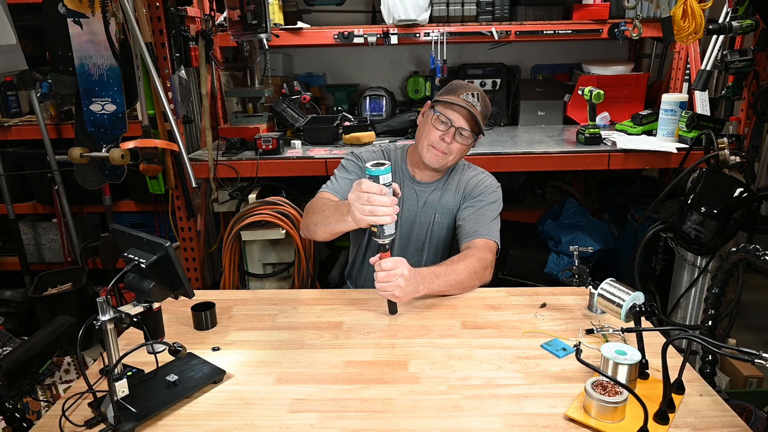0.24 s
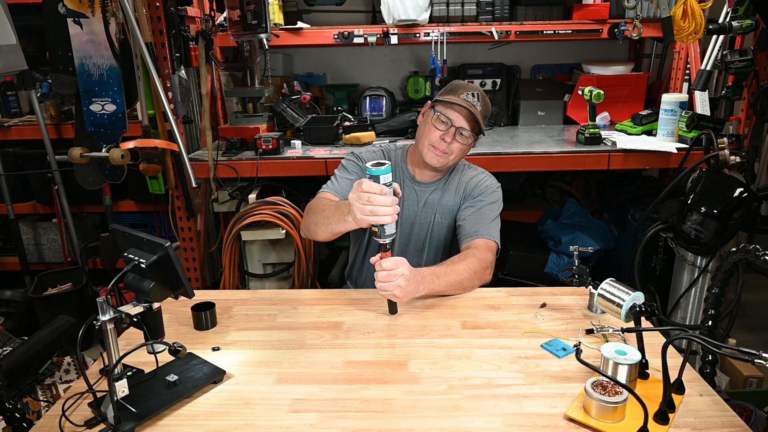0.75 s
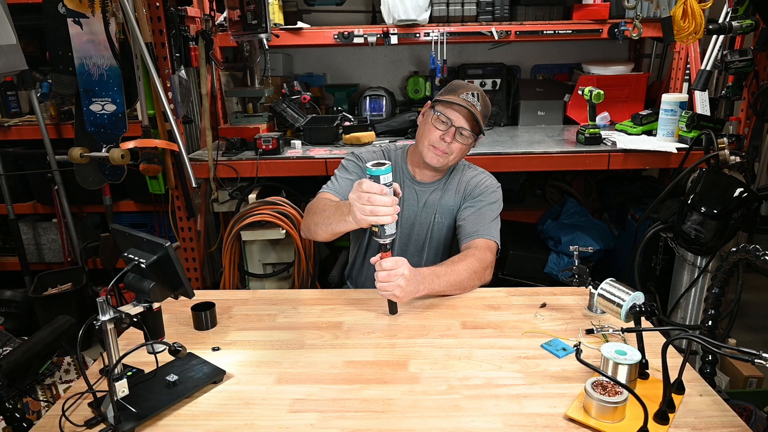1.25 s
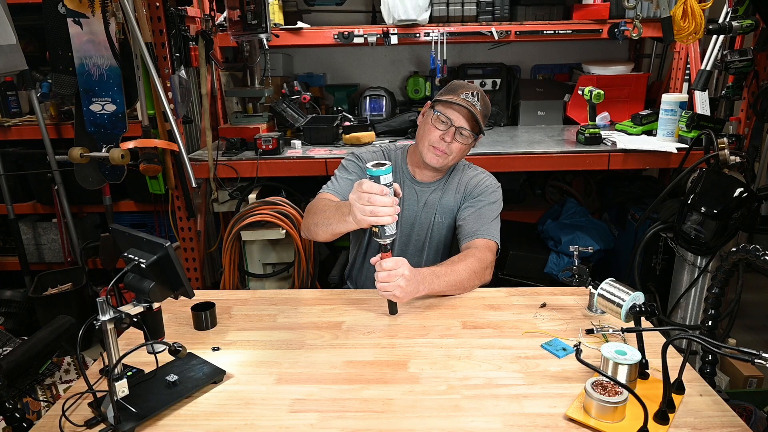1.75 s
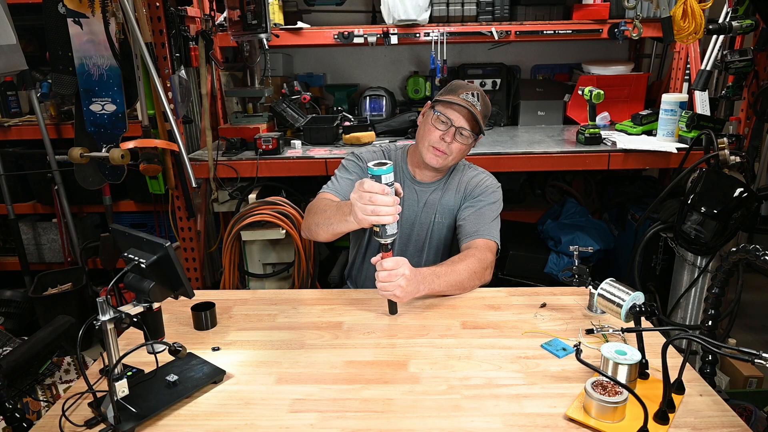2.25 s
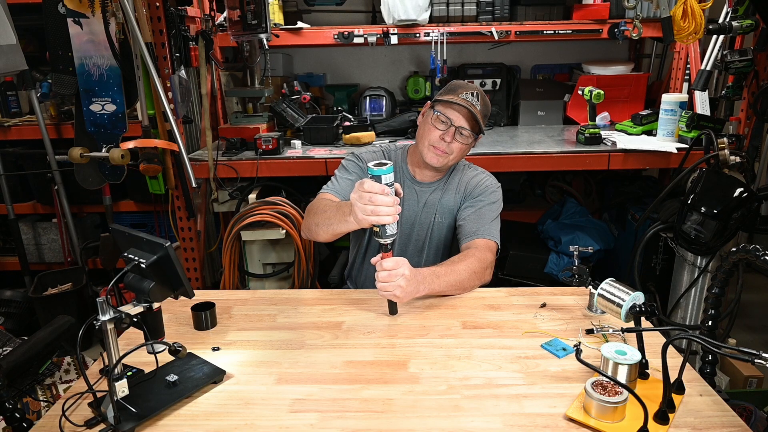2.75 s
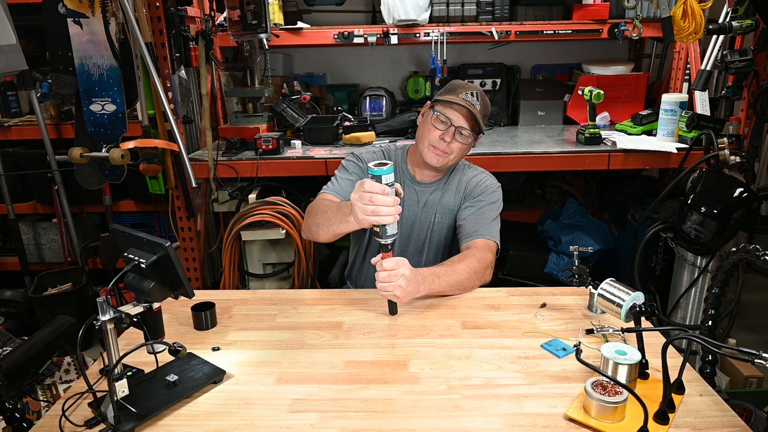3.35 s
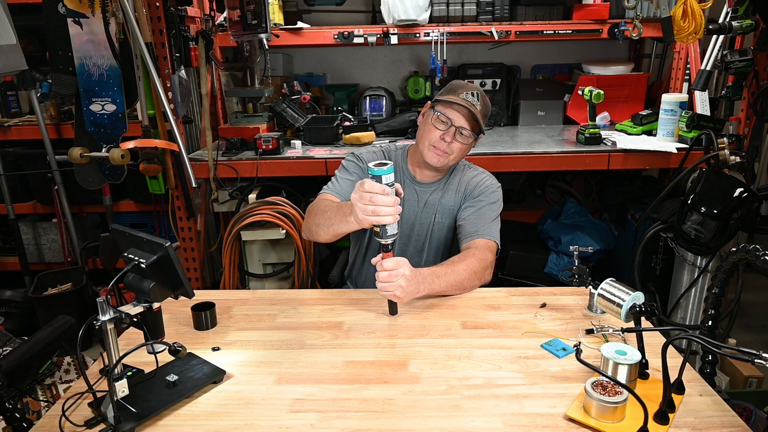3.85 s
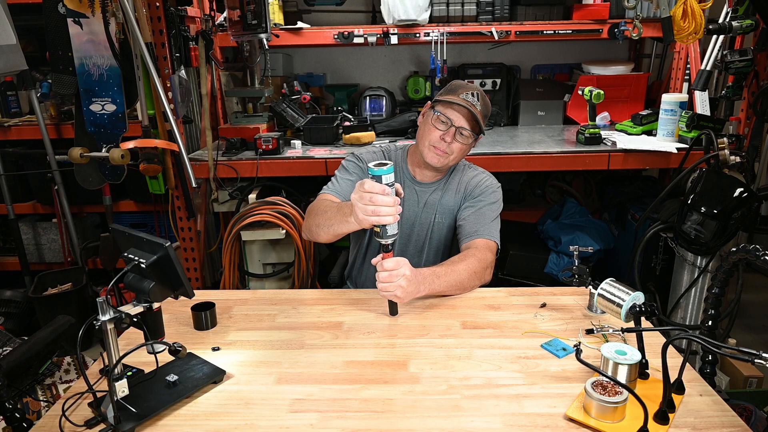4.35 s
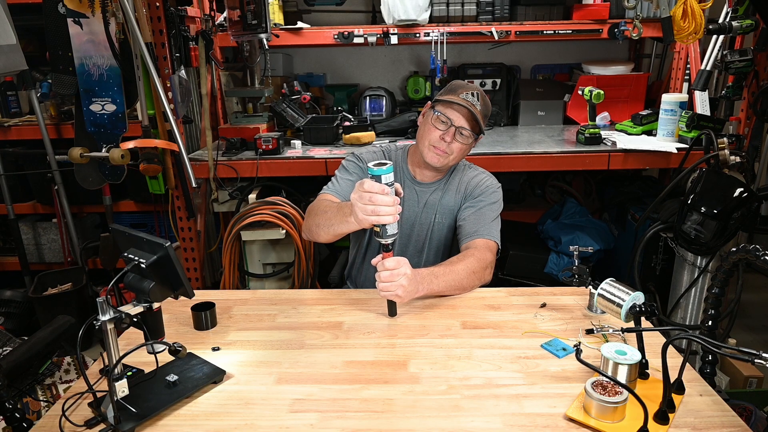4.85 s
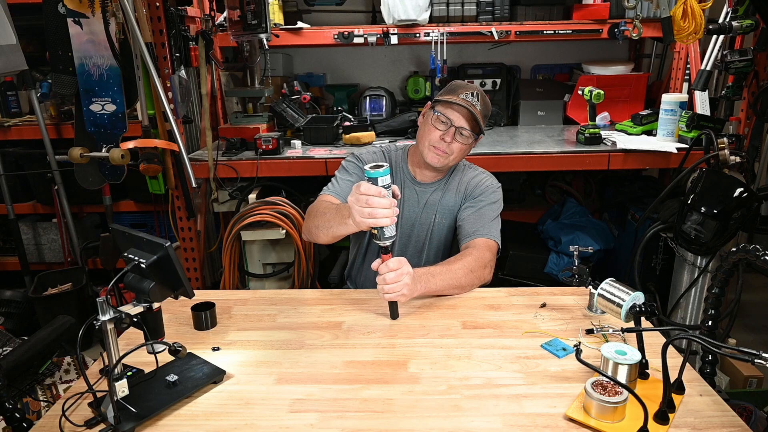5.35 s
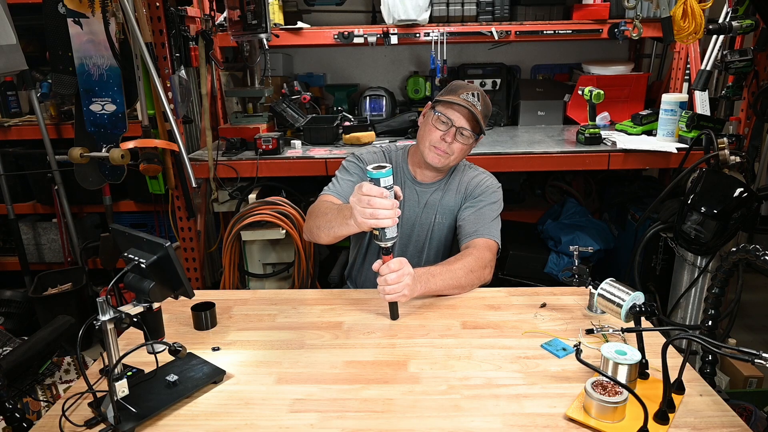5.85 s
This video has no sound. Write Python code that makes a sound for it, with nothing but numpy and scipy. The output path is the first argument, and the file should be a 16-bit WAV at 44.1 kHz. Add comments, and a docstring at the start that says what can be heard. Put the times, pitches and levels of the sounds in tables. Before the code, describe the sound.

A soft, spitting gas hiss from a butane can turns into a strong, sharp hiss, with light ticks and muffled knocks.

```python
"""Gas seeps and sputters, with a few ticks, as a butane can is pressed into the fill valve of a tool on a
workbench. Turbulence excites the resonances of the gap round the stem; after three seconds the seal
gives and it hisses hard, with brief puffs and a thin whistle. Towards the end the hand-damped can knocks
dully on its seat. A fan hums faintly behind, in a quiet shop."""
import sys
import numpy as np
from scipy import signal
from scipy.fft import rfft, irfft
from scipy.io import wavfile

SR = 44100
rng = np.random.default_rng(int(sys.argv[2]) if len(sys.argv) > 2 else 0)


def dump_mix(stems):
    """Bounce the given channels to the path in sys.argv[1] as a 16-bit WAV at rate SR."""
    frames = np.atleast_2d(stems).T  # one column per channel
    limited = np.clip(frames, -1, 1)  # hard clip at full scale
    pcm = np.round(limited * 32767).astype(np.int16)
    wavfile.write(sys.argv[1], SR, pcm)


N = 269010
TIME = np.arange(N) / SR
HZ = np.fft.rfftfreq(N, 1 / SR) + 1e-3


def from_db(db):
    """The decibel scale: amplitude grows tenfold every 20 dB."""
    return 10 ** (np.asarray(db) / 20)


def rms_one(x):
    """Normalisation to unit mean power."""
    return x / np.sqrt(np.mean(x ** 2) + 1e-20)


def in_time(points):
    """Linear interpolation of a curve at every sample."""
    seconds, value = np.transpose(points)
    return np.interp(TIME, seconds, value)


def over_hz(points):
    """Interpolation of a spectrum along a logarithmic frequency axis."""
    hz, value = np.transpose(points)
    return np.interp(np.log(HZ), np.log(hz), value)


def flutter(rate_hz):
    """Random modulation: low-passed noise of unit rms wavers up to about the given rate."""
    return rms_one(irfft(rfft(rng.standard_normal(N)) / np.sqrt(1 + (HZ / rate_hz) ** 4), N))


def stereo_noise(correlation):
    """Partial coherence: spectra of white noise at two microphones that hear partly the same thing."""
    alike = np.clip(correlation, 0, .999)
    mid, side = rfft(rng.standard_normal((2, N)))
    return np.sqrt(1 + alike) * mid + np.sqrt(1 - alike) * side * [[1], [-1]]


def resonances(modes, valley_db):
    """Resonant gain: steep-sided peaks add in power over a weak broad bed that fades in the bass."""
    power = sum((from_db(db) / (1 + ((HZ ** 2 - hz ** 2) / (HZ * width)) ** 2)) ** 2
                for hz, width, db in modes)
    return np.sqrt(power + from_db(valley_db) ** 2 / (1 + (1050 / HZ) ** 8))


def fan(air_db, waver_db):
    """Broadband and tonal noise: moving air rushes softly under a few slightly wavering motor lines."""
    # Each row: frequency in Hz, relative spectral density in dB.
    air_spectrum = [(20, -19), (45, -10), (70, -4.5), (130, -1.5), (250, -1), (480, 2.5), (750, -.5),
                    (1100, 1.5), (2000, -8), (6000, -6), (16000, -12)]
    # Each row: frequency in Hz, level in dB.
    motor_lines = [(296.1, -77), (355.3, -80.5), (473.7, -83.5), (597.5, -82.5), (834.4, -84.5),
                   (1077, -80)]
    air = rms_one(irfft(stereo_noise(correlation=0.48) * from_db(over_hz(air_spectrum)), N))
    hum = 0
    for hz, db in motor_lines:
        amplitude = np.sqrt(2) * from_db(db + waver_db * flutter(rate_hz=3.5))
        hum += amplitude * np.sin(2 * np.pi * hz * TIME + 0.73 * flutter(rate_hz=2.3))
    return from_db(air_db) * air + hum * from_db([[.7], [-.7]])


def shop(x, tail_db, t60_s):
    """Reverberation: convolution adds near reflections and a short diffuse tail to the direct sound."""
    # Reflections off bench and shelves. Each row: delay in seconds, left and right gain in dB.
    echoes = [(.0022, -15, -14), (.0158, -17, -17), (.0192, -19, -19)]
    response = rng.standard_normal((2, SR // 2)) * from_db(-60 * TIME[:SR // 2] / t60_s)
    response *= from_db(tail_db) / np.sqrt(np.sum(response[0] ** 2))
    response[:, 0] = 1
    for delay, left_db, right_db in echoes:
        response[:, int(delay * SR)] += from_db([left_db, right_db])
    return signal.fftconvolve(x[None], response, axes=1)[:, :N]


def strike(events, modes, spread_db, contact_hz):
    """Modal ringing: each impact excites every mode by a varying amount; a soft contact dulls it."""
    starts, level_db = np.transpose(events)
    chance = rng.standard_normal((len(events), len(modes)))
    ringing = np.zeros(N)
    for k, (hz, db, t60) in enumerate(modes):
        impulses = np.zeros(N)
        impulses[(starts * SR).astype(int)] = from_db(level_db + db + spread_db * chance[:, k])
        radius, angle = from_db(-60 / (t60 * SR)), 2 * np.pi * hz / SR
        feedback = [1, -2 * radius * np.cos(angle), radius ** 2]
        ringing += signal.lfilter([.5, 0, -.5], feedback, impulses + 1e-18)
    return signal.sosfilt(signal.butter(2, contact_hz, fs=SR, output="sos"), ringing)


def stem_ticks():
    """Hard contact: the stem ticks in the valve and rings briefly in its modes."""
    # Each row: start in seconds, strength in dB.
    ticks = [(0.4575, -38.5), (0.863, -38.5), (1.3694, -37.5), (1.5655, -48), (1.6762, -42), (1.8822, -48),
             (2.1446, -38.5), (2.5452, -47)]
    # Each row: frequency in Hz, gain in dB, 60 dB decay time in seconds.
    stem_modes = [(420, -23, 0.0092), (1150, -13, .005), (1820, -2, 0.0077), (2440, -1.5, 0.025),
                  (2770, -2, 0.018), (3300, -12, .005)]
    return strike(ticks, stem_modes, spread_db=1, contact_hz=4500)


def can_knocks():
    """Damped vibration: the can knocks dully on its seat while the hand absorbs its ringing."""
    # Each row: start in seconds, strength in dB.
    knocks = [(4.578, -56.5), (4.661, -59), (5.091, -54), (5.2366, -39.5), (5.397, -50.5), (5.403, -54),
              (5.6105, -47.5), (5.622, -50), (5.627, -44), (5.658, -44.5), (5.681, -46.5), (5.724, -56),
              (5.7674, -38.5), (5.7705, -51), (5.784, -50), (5.8732, -43.5), (6.037, -55), (6.052, -47.5),
              (6.083, -59)]
    # Each row: frequency in Hz, gain in dB, 60 dB decay time in seconds.
    can_modes = [(280, -22, .016), (584, -10, 0.019), (974, 6.5, 0.018), (1210, -4, 0.017),
                 (1600, -14, .007)]
    return from_db(1.5) * strike(knocks, can_modes, spread_db=2.0, contact_hz=1990)


def spurts():
    """Noise-driven resonance: as the can shifts, a side gap opens for a moment and lets out a puff."""
    # Each row: peak time and half length in seconds, centre and width in Hz, level in dB.
    puffs = [(2.542, 0.021, 11300, 5000, -49), (3.174, 0.044, 11300, 3000, -44),
             (4.44, 0.015, 10400, 3000, -42), (4.836, 0.016, 6600, 3050, -48.5)]
    noise = stereo_noise(correlation=1.0)
    sound = 0
    for peak_s, half_s, hz, width, db in puffs:
        band = rms_one(irfft(noise * resonances([(hz, width, 0)], valley_db=-21), N))
        sound += from_db(db) * np.exp(-((TIME - peak_s) / half_s) ** 2) * band
    return sound


def whistle(hz, width_hz):
    """Edge tone: as the gap narrows, an unsteady whistle at the valve's lip rises out of the hiss."""
    # Each row: time in seconds, level in dB.
    swell = [(4.85, -65), (4.98, -50), (5.3, -48), (5.5, -62), (6.1, -64)]
    peak = resonances([(hz, width_hz, 0)], valley_db=-60)
    tone = rms_one(irfft(stereo_noise(correlation=.85) * peak, N))
    return from_db(in_time(swell)) * tone * from_db([[1.3], [-1.3]])


def scatter(depth):
    """Multipath interference: the shelves return the jet by many paths, rippling its spectrum finely."""
    paths = rng.standard_normal(N) * (TIME > .006) * np.exp(-TIME / .014)
    return np.abs(1 + depth * rfft(paths) / np.sqrt(np.sum(paths ** 2)))


def turbulence():
    """Jet noise: its spectra at the two microphones differ in level and phase and are partly coherent."""
    # A reflection off the bench hollows the spectrum at fixed places. Each row: centre and width in Hz, gain in
    # dB.
    hollows = [(1140, 89, -1.5), (2230, 116, -3), (4980, 120, -2.5), (7850, 140, -2.5), (13080, 220, -5)]
    # Each row: frequency in Hz, correlation of left and right.
    likeness = [(700, .7), (1400, .985), (3400, .995), (4200, .89), (5200, .95), (6100, .7), (7800, .72),
                (9000, .9), (10800, .7), (12000, .8), (15500, .75)]
    # Each row: frequency in Hz, left minus right level in dB.
    balance = [(1000, .3), (2500, 0), (3900, -.4), (4500, 1.1), (6300, .3), (8000, 5), (9000, 3.1),
               (10400, 3), (11400, -.8), (12100, 2.5), (13000, 0), (13800, 2), (15500, .7)]
    # Each row: frequency in Hz, phase lead of the right side in radians.
    right_lead = [(7200, 0), (8300, .6), (9700, .6), (10300, .25), (12000, .5), (15500, .35)]
    hollows_db = sum(db / (1 + (2 * (HZ - hz) / width) ** 2) for hz, width, db in hollows)
    jet = stereo_noise(over_hz(likeness)) * from_db(hollows_db + over_hz(balance) * [[.5], [-.5]])
    return jet * np.exp(1j * over_hz(right_lead) * [[0], [1]]) * scatter(depth=.46)


def ramp(start_s, length_s):
    """Linear rise from 0 to 1, then held."""
    return np.clip((TIME - start_s) / length_s, 0, 1)


def dying(start_s, decay_s):
    """Exponential decay from 1, held until the start."""
    return np.exp(-np.maximum(TIME - start_s, 0) / decay_s)


def choking(k, attack_s=.015):
    """Throttling: the can tilts and chokes the treble; gives the loss of register k in dB."""
    # Each row: start and length in seconds, depth in dB before the register's weight.
    chokes = [(4.573, 0.11, 1.2), (4.802, .115, 6.5), (4.973, 0.23, 4), (5.105, 0.023, 9),
              (5.16, 0.05, 6.5), (5.24, 0.026, 6), (5.31, 0.085, 2.5)]
    # For each register: weight of the chokes, then recovery time in seconds.
    weight = [0, 0, 0, 1.15, 1]
    recovery_s = [.03, .03, .03, 0.066, 0.072]
    dips = [db * ramp(start, attack_s) * dying(start + length, recovery_s[k])
            for start, length, db in chokes]
    return weight[k] * np.max(dips, axis=0)


def pushing(k, attack_s=0.036, settle_s=0.35, ease_off_s=0.84, eased_calm=0.79):
    """Flow governs jet noise: each push sets the level, sputter and chugging of register k, in dB."""
    # Each row: start and easing time in seconds, flow in dB relative to full, ring-up time in seconds,
    # sputter and chugging depth in dB. The registers weight the flow and both depths.
    pushes = [(-.06, 2.05, -7.5, 0.18, 1.53, 1.5), (2.987, 6.5, 0, 0.14, .75, 0.5)]
    # Each list has one value for each register.
    full_flow_db = [-55.5, -45.5, -53.5, -38.5, -45.5]
    flow_exponent = [1.16, 0.95, 1.21, 1.17, 0.9]
    unsettled_db = [-2.5, -5, -8.5, 1, 7]  # a fresh gap is narrow and bright until the stem settles
    unrung_db = [2.5, 3.5, 2, -10.5, -2.5]  # its hiss takes a moment to ring up
    eased_db = [-6, -7.5, -7, -12.5, -.4]  # easing off pinches the gap, leaving mostly fizz
    state = 0
    for start, ease, flow_db, ring_up_s, sputter_db, chug_db in pushes:
        unsettled, unrung = dying(start, settle_s), dying(start, ring_up_s)
        eased = ramp(ease, ease_off_s)
        steady_db = full_flow_db[k] + flow_exponent[k] * flow_db
        level_db = steady_db + unsettled_db[k] * unsettled + unrung_db[k] * unrung + eased_db[k] * eased
        push = np.array([level_db,
                         sputter_db * (1 - eased_calm * eased),
                         chug_db * (1 - unrung) * (1 - eased)])
        state = state + (push - state) * ramp(start, attack_s)  # each push takes over from the last
    return state


def gas_hiss(chug_hz, sputter_per_choke):
    """Source and filter: turbulence rings the gap round the stem, and drops modulate the amplitude."""
    # Resonances of the gap at three openings. Each row: centre and width in Hz, relative level in dB.
    seep = [(1710, 960, -16), (2770, 970, -14.5), (3660, 1900, -11.5), (4538, 570, -6), (5480, 780, -13.5),
            (7760, 980, -15), (9050, 850, -5), (9460, 240, -5), (10250, 440, 0), (10810, 380, -6),
            (11710, 670, -3.5), (12330, 1130, -12), (13490, 830, -10.5), (14800, 1600, -21)]
    leak = [(1350, 1220, -22), (1840, 880, -14), (3050, 1100, -11), (3740, 1250, -9), (4530, 450, -9),
            (5410, 430, -17), (6570, 690, -17.5), (7480, 720, -17.5), (8340, 460, -5), (8920, 520, 0.5),
            (9630, 220, -3), (10130, 580, -2), (10700, 1230, -11), (11730, 1100, -8.5), (13530, 610, -11),
            (14930, 1280, -16)]
    spray = [(1350, 1500, -20), (1910, 1000, -15), (2970, 770, -11.5), (3650, 1150, -10.5), (4520, 370, -8),
             (5480, 260, -18.5), (6720, 750, -19.5), (8360, 1440, -13), (8890, 390, -1), (9530, 580, 1),
             (9740, 120, -3), (10900, 1360, -7.5), (11750, 240, -11), (12200, 960, -10),
             (13800, 490, -11.5), (14800, 1390, -17)]
    # Each row: time in seconds, opening (0 seep, 1 open leak, 2 spray).
    openings = [(3.15, 0), (3.35, .3), (3.6, 0.89), (5.15, 1.37), (5.52, 2)]
    # The edges divide five registers: low blow, rush, valley, sharp hiss and top fizz.
    edges_hz = [2400, 6200, 8000, 11100]
    # For each register: a spray's lift in dB, then weights of common sputter, own sputter and chugging.
    spray_db = [0.5, 0, 0.5, 3, 2]
    common_weight = [0.75, 0.53, 0.86, 0.89, 0.46]
    own_weight = [0.65, 0.74, 0.82, 0.66, 1.14]
    chug_weight = [0.23, 0, 0, 0.43, 1.2]
    jet, registers = turbulence(), np.digitize(HZ, edges_hz)
    colours = [resonances(seep, valley_db=-27.5), resonances(leak, valley_db=-31.5),
               resonances(spray, valley_db=-33)]
    opening = in_time(openings)
    shares = [np.clip(1 - np.abs(opening - stage), 0, 1) for stage in range(len(colours))]
    drops = flutter(rate_hz=96)
    # Slugs of liquid pass the seal almost regularly and pump the finest fizz most.
    slug_hz = chug_hz * (1 + .13 * flutter(rate_hz=9))
    slugs = np.sin(2 * np.pi * np.cumsum(slug_hz) / SR)
    hiss = 0
    for k in range(len(edges_hz) + 1):
        band = sum(share * rms_one(irfft(jet * colour * (registers == k), N))
                   for share, colour in zip(shares, colours))
        level_db, sputter_db, chug_db = pushing(k)
        choke_db = choking(k)
        flicker = common_weight[k] * drops + own_weight[k] * flutter(rate_hz=55)
        flicker_db = (sputter_db + sputter_per_choke * choke_db) * flicker
        pulse_db = chug_weight[k] * chug_db * slugs
        hiss += band * from_db(level_db + spray_db[k] * shares[-1] - choke_db + flicker_db + pulse_db)
    return hiss


def scene():
    """Superposition: gas, ticks and knocks at the bench add to the fan; the impacts reverberate."""
    impacts = stem_ticks() + can_knocks()
    gas = gas_hiss(chug_hz=22.94, sputter_per_choke=0.11) + whistle(hz=9580, width_hz=120) + spurts()
    return gas + shop(impacts, tail_db=-10.5, t60_s=.28) + fan(air_db=-63, waver_db=0.95)


def record(dry):
    """Band limiting: a steep low-pass removes the highest treble."""
    cutoff_hz = 15750
    return irfft(rfft(dry) / np.sqrt(1 + (HZ / cutoff_hz) ** 400), N)


dry = scene()
out = record(dry)
dump_mix(out)
```